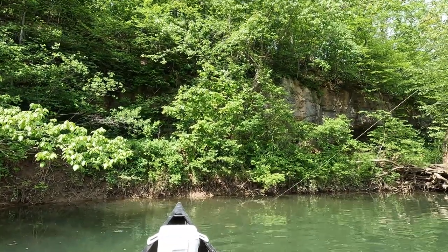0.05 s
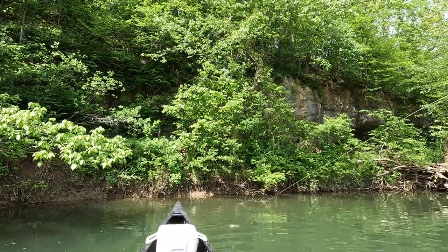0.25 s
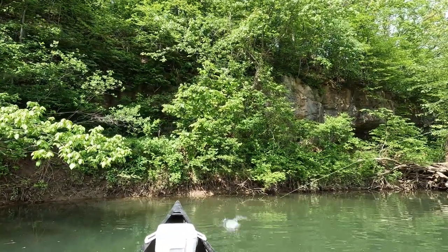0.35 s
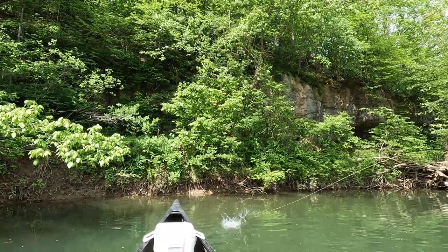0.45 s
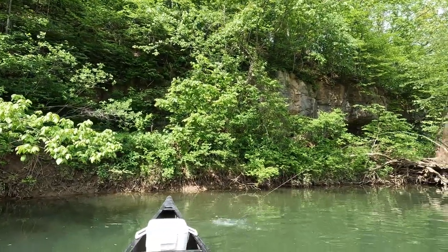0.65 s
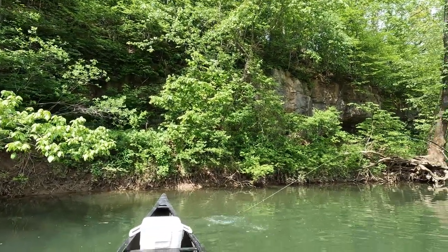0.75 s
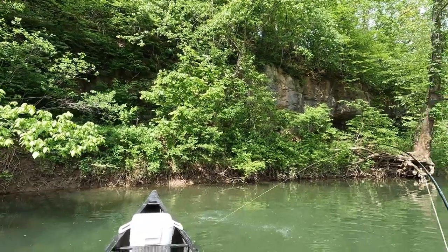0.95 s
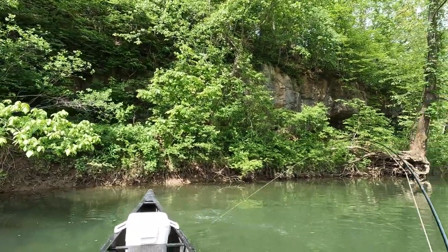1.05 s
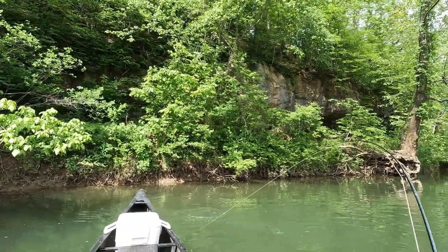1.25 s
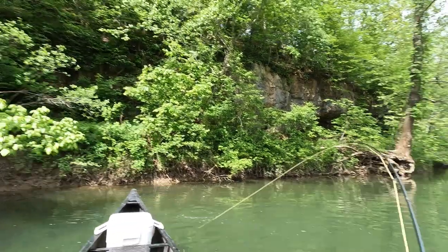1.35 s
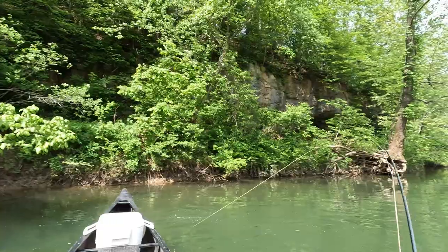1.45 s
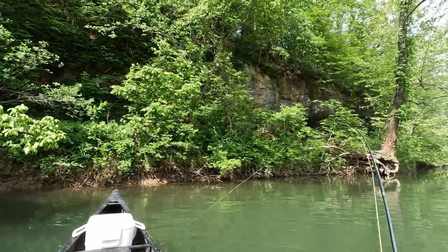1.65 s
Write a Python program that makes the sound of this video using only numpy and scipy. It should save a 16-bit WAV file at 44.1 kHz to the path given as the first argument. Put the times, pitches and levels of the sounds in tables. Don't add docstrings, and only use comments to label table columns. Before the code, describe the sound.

A fly line hisses briefly through rod rings, slaps the water with bubbly plops and a sharp dry snap, then drops and foam patter away; faint birds and low wind on a wooded river, stereo microphone in a canoe.

```python
import sys
import numpy as np
from scipy import signal
from scipy.fft import rfft, irfft
from scipy.io import wavfile
from scipy.ndimage import uniform_filter1d

SR = 44100
rng = np.random.default_rng(int(sys.argv[2]) if len(sys.argv) > 2 else 0)


def put_to_file(sound):
    columns = np.atleast_2d(sound).T
    safe = np.clip(columns, -1, 1)
    whole_steps = np.round(safe * 32767)
    wavfile.write(sys.argv[1], SR, whole_steps.astype(np.int16))


def elevation(decibels):
    levels = np.asarray(decibels, float)
    return 10 ** (levels / 20)


N = 72765
T = np.arange(N) / SR

# time in s, level in dB.
LINE_HISS_LEVEL = [(0, -78.5), (.1, -96.5), (.123, -72), (.138, -76), (.152, -67), (.25, -59), (.3, -56),
                   (.455, -52), (.468, -69.5), (.51, -91), (.555, -67), (.575, -88), (.748, -75.5),
                   (.77, -62.5), (.806, -68), (.817, -80), (.831, -65), (.87, -96)]
# frequency in Hz, density in dB per Hz.
RING_SPECTRUM = [(1600, -18.5), (2900, -6.5), (3800, 0.5), (4700, 0.5), (5700, -9), (7700, -20),
                 (8800, -27), (13000, -26.5)]
# frequency in Hz, left minus right in dB.
RING_BALANCE = [(60, -10), (240, -16), (950, -4), (3770, -4.5), (15000, 2.5)]
RING_LIKENESS, RING_LEAD_RAD = 0.91, -0.81

# start in s, peak in dB, pitch in Hz, ring t60 in s.
SLAP_BUBBLES = [(0.4015, -25, 1257, 0.0094), (0.4035, -31, 2030, 0.0065), (0.408, -25, 1180, 0.005),
                (0.4115, -36.5, 1650, 0.0091), (0.4118, -44, 900, 0.017), (.4145, -32.5, 1150, 0.012),
                (.4205, -49, 1130, 0.011), (0.4272, -38, 1190, 0.009), (0.4328, -32, 1100, 0.016),
                (.433, -39, 696, 0.017), (.433, -32.5, 1870, 0.0043), (0.4395, -26.5, 1720, 0.0035),
                (.4395, -34, 890, 0.01), (.4425, -33, 1100, 0.012), (.454, -38.5, 1030, 0.011)]
# start in s, peak in dB, pitch in Hz, ring t60 in s.
SPLASH_BUBBLES = [(0.485, -52, 1110, 0.018), (0.489, -47.5, 1006, 0.031), (.496, -50, 696, 0.018),
                  (0.515, -46.5, 824, 0.02), (.519, -54, 1210, 0.025), (.524, -56.5, 830, 0.041),
                  (.529, -52, 1530, 0.013), (.531, -54, 1115, 0.022), (.542, -62, 1840, 0.03),
                  (0.56, -51.5, 890, 0.05), (0.584, -70, 1150, .018), (0.603, -59, 1110, 0.032),
                  (0.648, -53, 1170, 0.02), (.664, -56.5, 1910, 0.045), (0.676, -65, 1180, 0.059),
                  (0.682, -50.5, 1255, 0.037), (0.702, -56, 1040, 0.019), (0.773, -58, 1024, 0.032),
                  (0.819, -65.5, 1160, 0.028), (0.865, -66, 1200, 0.028), (0.901, -61, 1300, 0.03),
                  (0.938, -62, 1330, 0.018), (0.997, -69.5, 1980, 0.038), (0.995, -82, 1500, 0.014),
                  (1.003, -68.5, 3130, 0.031), (1.033, -72, 3100, 0.027)]
# start in s, peak in dB, pitch in Hz, t60 in s, glide as share of pitch.
DEEP_BUBBLE = (.682, -55, 370, .075, 1.0)
BUBBLE_GLIDE, BUBBLE_RISE_S, BUBBLE_CRACK_DB = 0.059, 0.0013, -10.5

# start in s, peak in dB, pitch in Hz, glide as share of pitch.
DROPS = [(0.588, -58, 3230, 0.21), (.64, -52.5, 3100, 0.065), (.672, -57, 11200, 0.),
         (0.686, -58.5, 3050, 0.52), (0.694, -61.5, 5270, 0.023), (.696, -59, 3340, .3),
         (0.841, -66, 2670, 0.16), (0.865, -60.5, 2180, 0.19), (0.879, -60, 2700, 0.26),
         (.8995, -58.5, 3320, .2), (.9, -58, 3830, 0), (.928, -65.5, 4200, -0.36), (.932, -69, 3680, -0.23),
         (0.943, -72, 4400, 0.41), (.946, -76, 3260, -0.05), (.971, -76, 3100, 0.51),
         (0.993, -64, 2230, 0.25), (0.996, -65.5, 2900, 0.58), (1.025, -65, 4940, 0), (1.048, -68, 4800, 0),
         (1.049, -78.5, 10500, -0.15), (1.082, -62.5, 3300, 0), (1.1295, -65, 4500, 0)]
DROP_T60, DROP_RISE_S = 0.0094, 0.00068
TICK_T60 = 0.0018

# time in s, level in dB.
FOAM_LEVEL = [(.26, -81.5), (.3, -71), (.4, -74.5), (.44, -53), (.449, -67.5), (.475, -70), (.55, -67),
              (.68, -61.5), (.75, -69.5), (.9, -79), (1.15, -100)]
# frequency in Hz, density in dB per Hz.
FOAM_SPECTRUM = [(180, -26), (300, -2), (813, -9.5), (1220, 1.5), (1550, -13), (2000, -12), (11200, -30),
                 (14000, -44)]
BUBBLES_PER_S, BUBBLE_SPREAD_DB, FOAM_WASH_DB = 2200, 1.4, -2

# start in s, sign, peak in dB, sweep time in s, sweep in half turns,
# settling frequency in Hz, sag power, decay in s, rise in s.
CRACK_SPIKES = [
    (.45942, -1, -19.5, .0002, .72, .5, .07, .024, .0001),
    (.45955, 1, -13, .00022, .3, 135, .28, .007, .00011),
]
# time in s, per port.
CREST_TIMES = [.00005, .00022]
# port, time in s, depth in dB, width in s.
PRESSURE_DIPS = [
    (0, .45942, -19.5, .00006),
    (0, .4572, -29, .0016),
    (0, .4625, -34, .002),
    (1, .45928, -19, .00016),
]
RIGHT_TONE_HZ, RIGHT_TONE_RISE_S, RIGHT_TONE_DB = 145, .012, -25
# time in s, length in s, level in dB, centre in Hz, width in Hz.
TIP_FIZZ = [
    (.4385, .003, -63, 11600, 1500),
    (.451, .006, -72, 11500, 800),
    (.4595, .0004, -54, 13000, 7000),
    (.4615, .0005, -63, 11500, 8000),
    (1.35, .018, -84, 3900, 1200),
]
FIZZ_LEFT_DB = 3

# start in s, length in s, start, middle and end pitch in Hz, level in dB.
WHISTLES = [(0, 0.013, 2100, 1993, 2290, -67), (0, 0.051, 2500, 2730, 3460, -81.5),
            (0.04, 0.12, 3370, 2700, 2220, -79.5), (1.084, 0.035, 796, 1467, 2680, -69.5),
            (1.101, 0.024, 1600, 2113, 2570, -73), (1.107, 0.041, 2510, 2550, 2670, -73.5),
            (1.076, .05, 2330, 2340, 2340, -82), (1.264, .09, 3080, 3045, 3070, -87.5),
            (1.458, .15, 3090, 3080, 3050, -85.5), (1.162, 0.027, 1810, 2076, 2200, -79.5),
            (1.173, 0.034, 2194, 1890, 1470, -77), (1.204, 0.053, 1523, 1554, 1560, -86.5),
            (1.154, 0.022, 2484, 2607, 2640, -80), (1.181, 0.024, 2630, 2590, 2500, -82),
            (1.212, 0.014, 2620, 2560, 2500, -83.5), (0.956, 0.016, 2646, 2700, 2700, -78.5),
            (1.373, 0.022, 2640, 2760, 2720, -71.5), (1.4, .016, 2810, 2775, 2720, -76.5),
            (1.41, 0.042, 2954, 3060, 3000, -81.5), (1.447, 0.028, 2450, 2360, 2330, -77),
            (1.524, 0.035, 2560, 2600, 2550, -72), (1.541, 0.025, 2620, 2665, 2725, -71),
            (1.578, .03, 2266, 2180, 2000, -77), (1.596, 0.061, 2147, 1674, 1540, -80.5)]
# centre in Hz, width in Hz, level in dB.
TRILLS = [
    (3100, 480, -91.5),
    (2607, 990, -89),
]
LULL_DB, LULL_S = -9, .12
BANK_DB, BANK_T60 = -15.5, 0.07

# frequency in Hz, density in dB per Hz.
WOODS_SPECTRUM = [(80, -10.5), (230, 1), (470, -22.5), (1650, -21), (2900, -21.5), (3700, -31.5),
                  (6500, -44), (15000, -44.5)]
WOODS_DB = -72.5
# time in s, level in dB.
HUM_LEVEL = [(0, -67), (.1, -66.5), (.4, -66.5), (.62, -65.5), (.9, -65), (1.2, -71), (1.3, -65),
             (1.45, -75.5), (1.66, -68)]
HUM_HZ, HUM_WIDTH_HZ = 164.8, 88.7
# time in s, level in dB.
WIND_LEVEL = [(0, -70), (.11, -56), (.27, -56), (.6, -60.5), (1.2, -67.5), (1.66, -60)]
WIND_HZ, WIND_LUMP_DB = 39, 0
WIND_LEFT_DB, WIND_TURN_S = 6, .65
HEAVE_HZ, HEAVE_DB = 13.2, 6
# frequency in Hz, density in dB per Hz.
STROKE_SPECTRUM = [(300, -7), (600, 2.5), (1000, -1.5), (2300, -16), (3800, -15.5), (5500, -34)]
STROKE_S, STROKE_LEN_S, STROKE_DB = 1.358, 0.094, -72

NOTCH_HZ, NOTCH_SHARE, NOTCH_DB = 8880, 0.089, -5
EDGE_HZ = 13400
# time in s, level of the side signal in dB.
STEREO_WIDTH = [(0, -3), (.2, 0), (.8, 0), (.95, -12), (1.1, -22), (1.3, -36)]


def evened(x):
    return x / np.sqrt(np.mean(x ** 2) + 1e-20)


def read(points, hz):
    f, value = np.transpose(points)
    return np.interp(np.log(hz + 1), np.log(f + 1), value)


def curve(points, after_db=-120):
    return elevation(np.interp(T, *np.transpose(points), right=after_db))


def colour(x, points):
    hz = np.fft.rfftfreq(N, 1 / SR)
    edges = [(points[0][0] * .7, -60)] + list(points) + [(points[-1][0] * 1.1, -90)]
    return irfft(rfft(x) * elevation(read(edges, hz)), N)


def slow(hz, order=2):
    lowpass = signal.butter(order, hz, fs=SR, output="sos")
    return evened(signal.sosfilt(lowpass, rng.standard_normal(N)))


def resonate(x, hz, width):
    turn, r = np.exp(2j * np.pi * hz * T), np.exp(-np.pi * width / SR)
    return 2 * (turn * signal.lfilter([1 - r], [1, -r], x / turn)).real


def resonant_noise(hz, width, ports=()):
    noise = rng.standard_normal((*ports, N))
    return evened(resonate(resonate(noise, hz, width), hz, width))


def add(mix, s, sound):
    part = mix[max(round(s * SR), 0):][:len(sound)]
    part += sound[:len(part)]


def pair(a, b, same):
    same = np.clip(same, 0, 1)
    return np.array([a, same * a + np.sqrt(1 - same ** 2) * b])


def line_hiss():
    slips = rng.standard_normal((2, N)) * elevation(2.0 * np.minimum(rng.exponential(1, (2, N)), 4))
    ports = [evened(colour(v, RING_SPECTRUM)) for v in slips]
    z = rfft(pair(*ports, RING_LIKENESS))
    hz = np.fft.rfftfreq(N, 1 / SR)
    lead = RING_LEAD_RAD * np.exp(-np.log((hz + 1) / 3400) ** 2 / .5)
    tilt = elevation(read(RING_BALANCE, hz) / 2) * np.exp(.5j * lead)
    return irfft(z * np.array([tilt, 1 / tilt]), N) * curve(LINE_HISS_LEVEL) * elevation(1.16 * slow(45))


def bubble(hz, t60, rise, glide=BUBBLE_GLIDE):
    t = np.arange(0, t60, 1 / SR)
    fade = np.minimum(t / rise, 1) * elevation(-60 * (t / t60) ** 1.24)
    return fade * np.sin(2 * np.pi * hz * t * (1 + glide * t / t60))


def large_bubbles():
    out = np.zeros(N)
    i = np.arange(200)
    puff_fade = np.exp(-i / 50) * np.minimum(i / 20, 1)
    for s, db, hz, t60 in SLAP_BUBBLES + SPLASH_BUBBLES:
        puff = uniform_filter1d(uniform_filter1d(rng.standard_normal(200), size=9), size=7)
        add(out, s, elevation(db) * bubble(hz, max(t60, .004), BUBBLE_RISE_S))
        add(out, s, elevation(db + BUBBLE_CRACK_DB) * puff * puff_fade)
    s, db, hz, t60, glide = DEEP_BUBBLE
    add(out, s, elevation(db) * bubble(hz, t60, .008, glide))
    return out


def drops():
    out = np.zeros(N)
    for s, db, hz, glide in DROPS:
        tap = uniform_filter1d(rng.standard_normal(60), size=6) * np.exp(-np.arange(60) / 14)
        ring = bubble(hz, DROP_T60, DROP_RISE_S, glide) if glide else bubble(hz, TICK_T60, .0002, 0)
        add(out, s, elevation(db) * ring)
        add(out, s, elevation(db - 14) * tap)
    return out


def foam():
    small = np.zeros((2, N))
    size = elevation(BUBBLE_SPREAD_DB * np.minimum(rng.exponential(1, N), 4))
    size = size * (rng.random(N) < BUBBLES_PER_S / SR)
    kind = rng.integers(0, 30, N)
    for k, hz in enumerate(np.geomspace(400, 6500, num=30)):
        ring = bubble(hz, 9 / hz, 1 / hz) * hz * elevation(read(FOAM_SPECTRUM, hz))
        small[k % 2] += signal.oaconvolve(size * (kind == k), ring)[:N]
    wash = [evened(colour(v, FOAM_SPECTRUM)) for v in rng.standard_normal((2, N))]
    both = evened(small + 2.0 * small[::-1]) + elevation(FOAM_WASH_DB) * pair(*wash, 0.9)
    return both * curve(FOAM_LEVEL)


def splash():
    return (large_bubbles() + drops()) * elevation([[-.5], [.5]]) + foam()


def crack():
    out = np.zeros((2, N))
    for port, spike, crest in zip(out, CRACK_SPIKES, CREST_TIMES):
        s, sign, db, width, turns, hz, sag, decay, rise = spike
        t = np.maximum(T - s, 0) ** 2 / (abs(T - s) + crest)
        phase = np.pi * turns * np.log(1 + t / width) + 2 * np.pi * hz * t
        after = (1 + t / width) ** -sag * np.exp(-t / decay) * np.cos(phase)
        port += sign * elevation(db) * np.where(T > s, after, np.exp(-((T - s) / rise) ** 2))
    for port, s, db, width in PRESSURE_DIPS:
        out[port] -= elevation(db) * np.exp(-((T - s) / width) ** 2)
    before = np.minimum(T - PRESSURE_DIPS[-1][1], 0)
    swing = np.sin(2 * np.pi * RIGHT_TONE_HZ * before + .6 * np.tanh(before / .001))
    out[1] -= elevation(RIGHT_TONE_DB) * np.exp(before / RIGHT_TONE_RISE_S) * swing
    return out + tip_fizz()


def tip_fizz():
    out = np.zeros((2, N))
    for s, length, db, hz, width in TIP_FIZZ:
        out += elevation(db) * resonant_noise(hz, width, (2,)) * np.exp(-((T - s) / length) ** 2)
    return out * elevation([[FIZZ_LEFT_DB], [-FIZZ_LEFT_DB]])


def lull_db():
    return LULL_DB * np.exp(-(T / LULL_S) ** 2)


def birds():
    out = np.zeros(N)
    for hz, width, db in TRILLS:
        out += elevation(db + 3.7 * slow(2.3) + 2 * lull_db()) * resonant_noise(hz, width)
    for s, length, start, middle, end, db in WHISTLES:
        u = np.arange(0, 1, 1 / (SR * length))
        hz = start * (1 - u) * (1 - 2 * u) + 4 * middle * u * (1 - u) + end * u * (2 * u - 1)
        swell = np.sin(np.pi * u ** .8) ** .7
        add(out, s, elevation(db) * np.sqrt(2) * swell * np.sin(2 * np.pi * np.cumsum(hz) / SR))
    return out * elevation(3.0 * slow(110))


def bank(x):
    t = np.arange(SR // 2) / SR
    tail = rng.standard_normal((2, len(t))) * elevation(-60 * t / BANK_T60) * (t > .02)
    return signal.fftconvolve(x[None], tail / np.linalg.norm(tail[0]), axes=1)[:, :N]


def wind():
    ports = [slow(WIND_HZ, order=4) + elevation(HEAVE_DB) * slow(HEAVE_HZ) for port in range(2)]
    lean = elevation(np.outer([1, -1], WIND_LEFT_DB * np.exp(-(T / WIND_TURN_S) ** 4)))
    return pair(*ports, 0.14) * curve(WIND_LEVEL) * elevation(WIND_LUMP_DB * slow(7.8)) * lean


def rod_stroke():
    swell = np.exp(-((T - STROKE_S) / STROKE_LEN_S) ** 2)
    return evened(colour(rng.standard_normal(N), STROKE_SPECTRUM)) * elevation(STROKE_DB) * swell


def hull_hum():
    return resonant_noise(HUM_HZ, HUM_WIDTH_HZ) * curve(HUM_LEVEL)


def woods():
    air = [evened(colour(v, WOODS_SPECTRUM)) for v in rng.standard_normal((2, N))]
    return elevation(WOODS_DB + 0.13 * slow(7.7) + lull_db()) * pair(*air, 0.56)


def scene():
    far, water = birds(), splash()
    soft = line_hiss() + water + far + elevation(BANK_DB) * bank(far + water.mean(0))
    soft += woods() + hull_hum() + wind() + rod_stroke()
    hz = np.fft.rfftfreq(N, 1 / SR)
    dip = elevation(NOTCH_DB * np.exp(-(np.log((hz + 1) / NOTCH_HZ) / NOTCH_SHARE) ** 2))
    lowpass = signal.butter(10, EDGE_HZ, fs=SR, output="sos")
    return signal.sosfilt(lowpass, irfft(rfft(soft) * dip, N)) + crack()


def band_limit(x):
    return signal.sosfilt(signal.butter(12, 16470, fs=SR, output="sos"), x)


def record(dry):
    mid = (dry[0] + dry[1]) / 2
    side = (dry[0] - dry[1]) / 2 * curve(STEREO_WIDTH, after_db=STEREO_WIDTH[-1][1])
    return band_limit(np.array([mid + side, mid - side]))


dry = scene()
out = record(dry)
put_to_file(out)
```